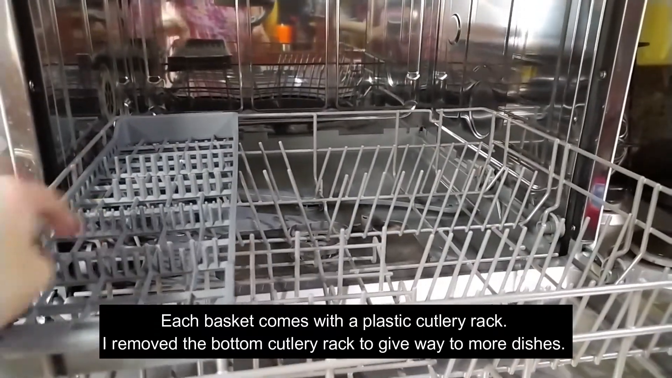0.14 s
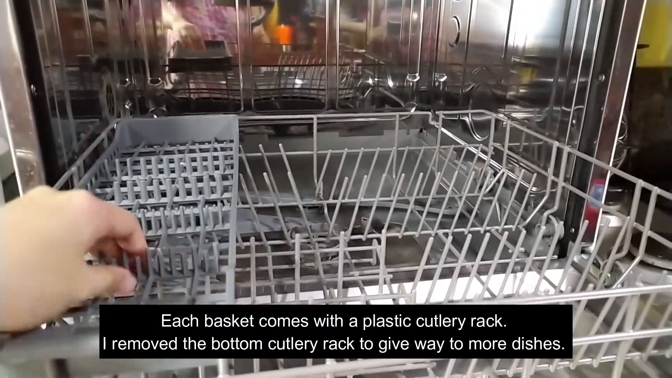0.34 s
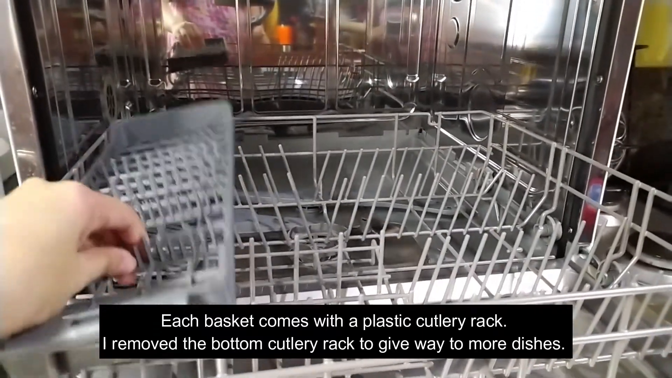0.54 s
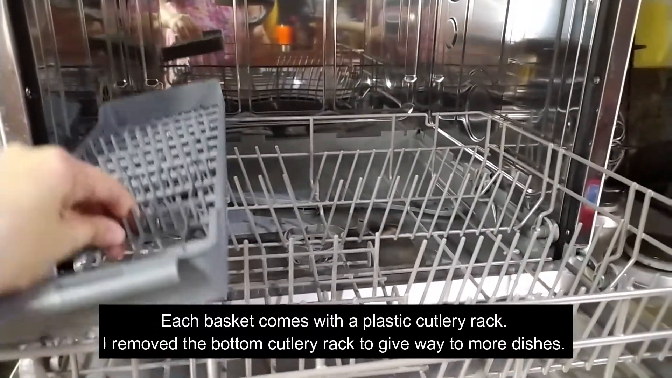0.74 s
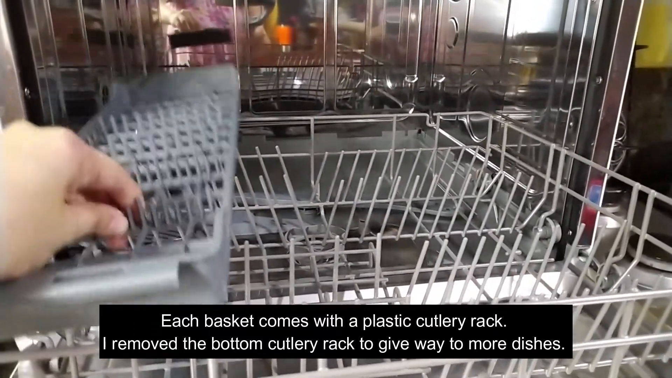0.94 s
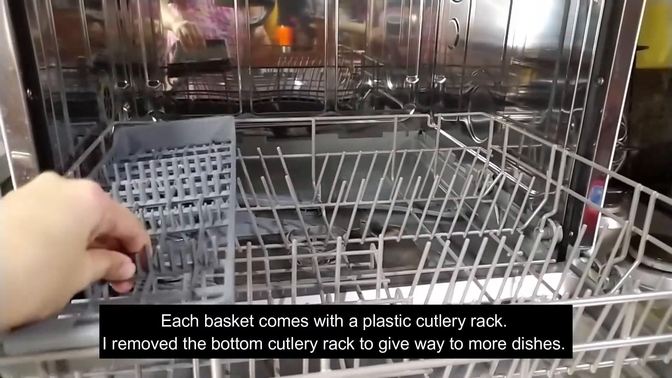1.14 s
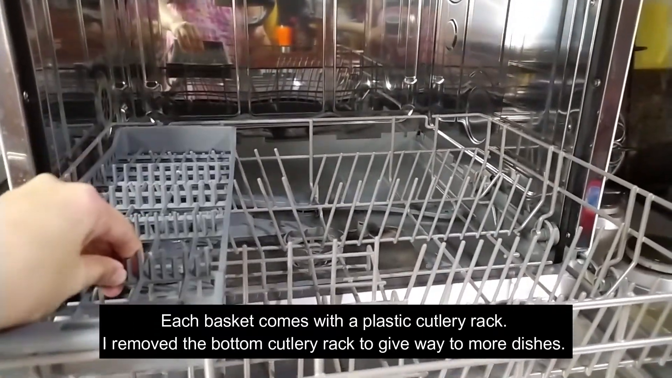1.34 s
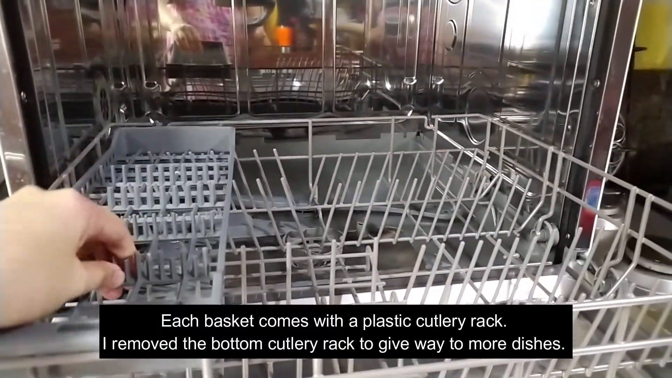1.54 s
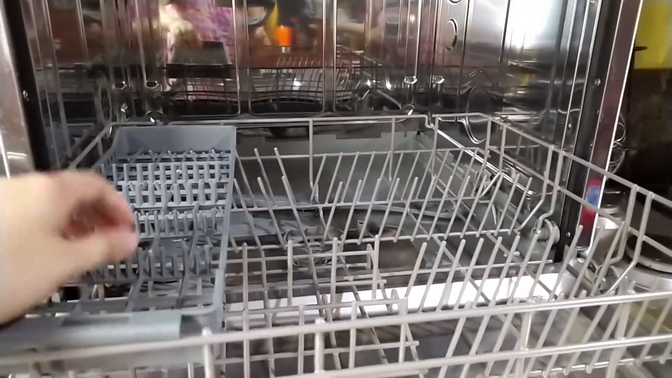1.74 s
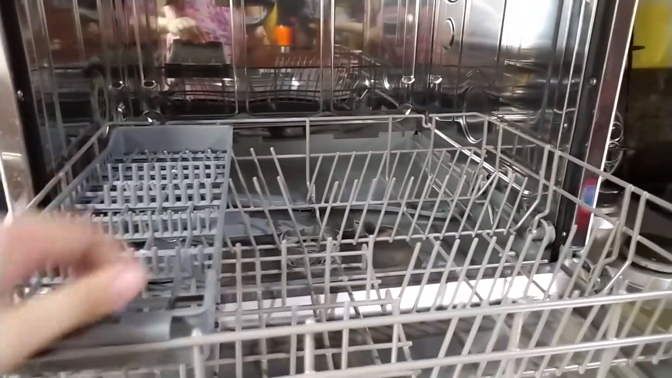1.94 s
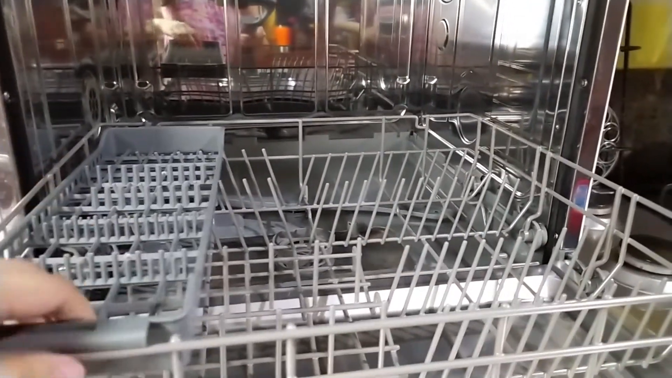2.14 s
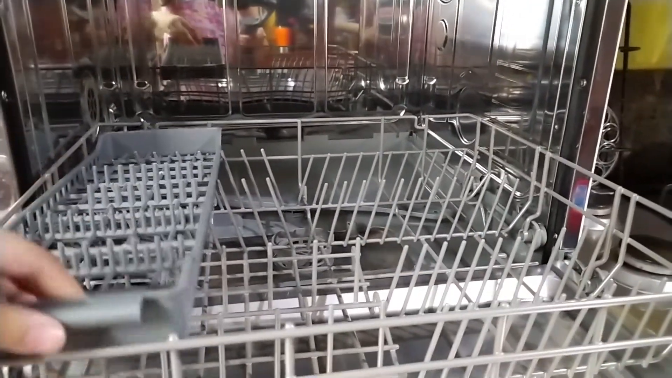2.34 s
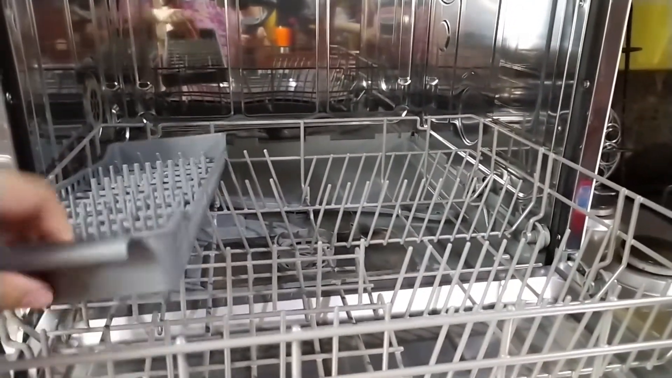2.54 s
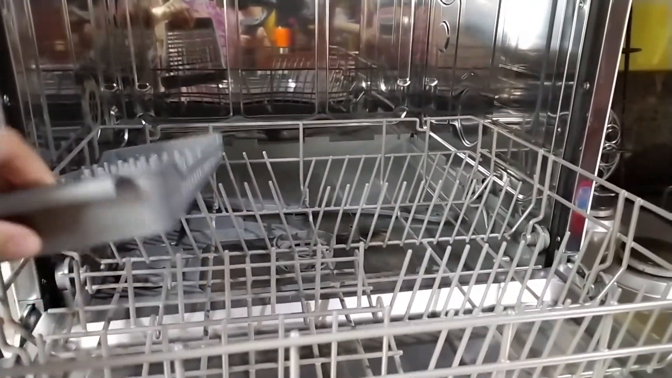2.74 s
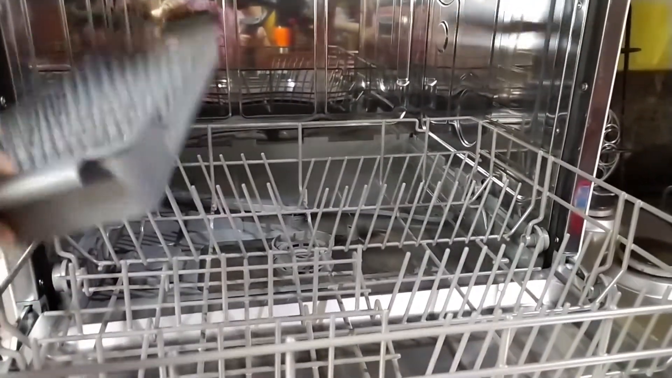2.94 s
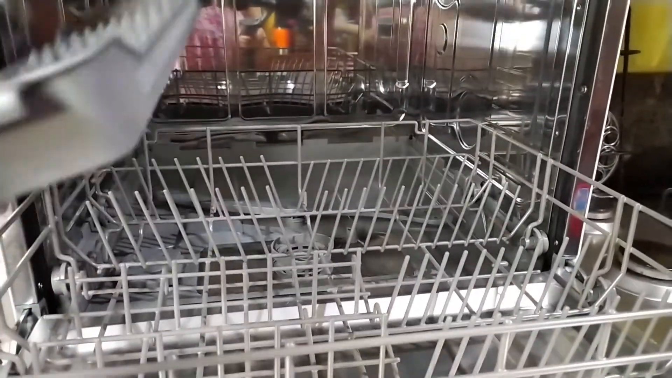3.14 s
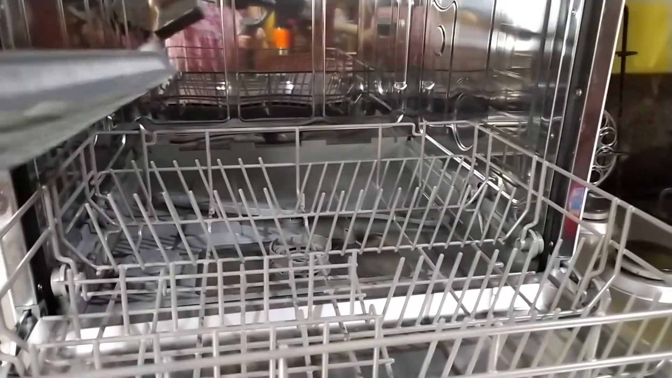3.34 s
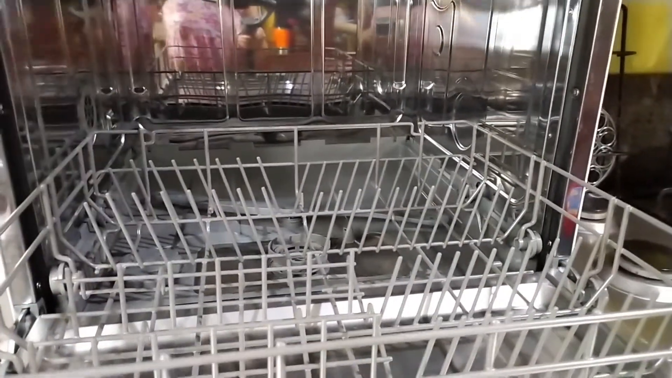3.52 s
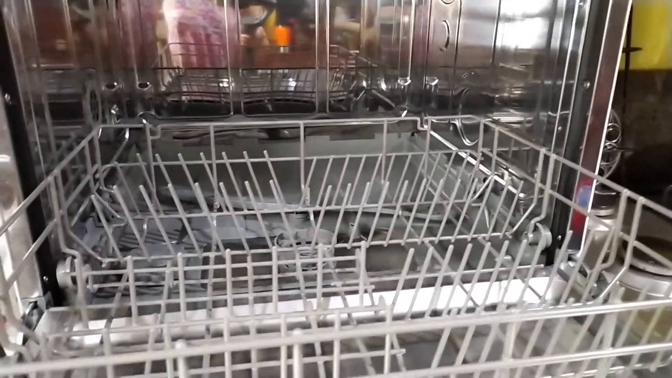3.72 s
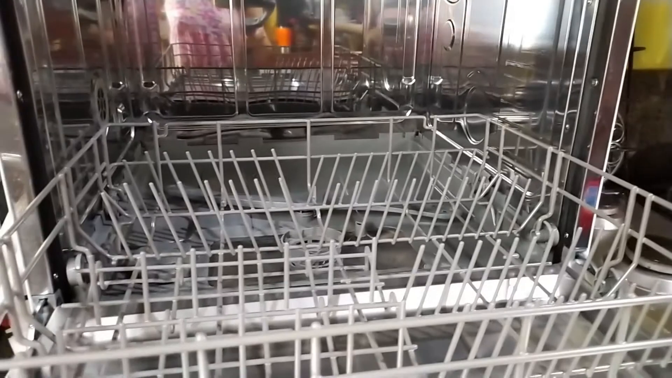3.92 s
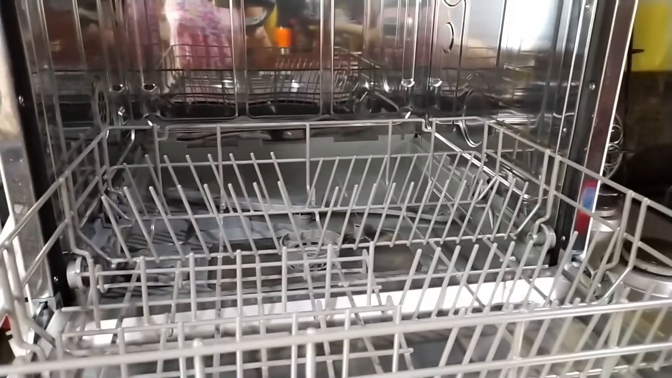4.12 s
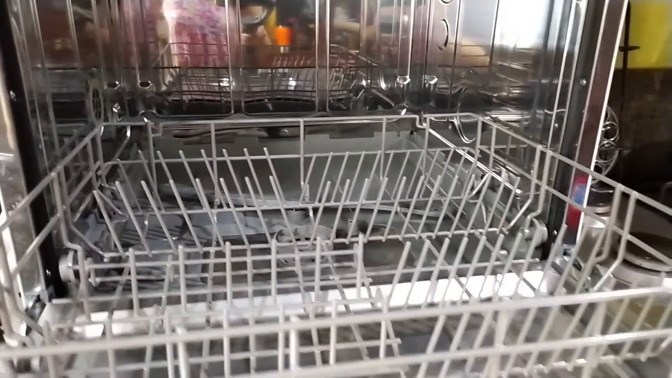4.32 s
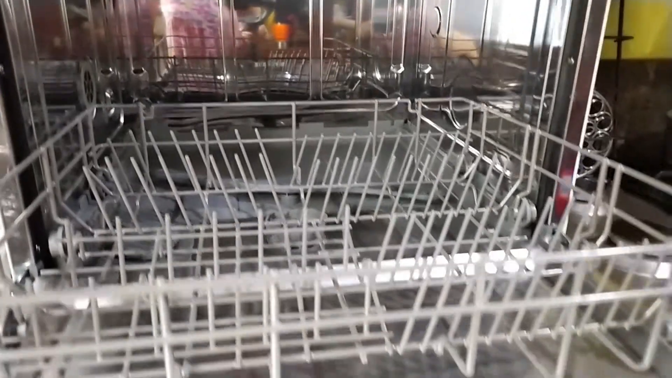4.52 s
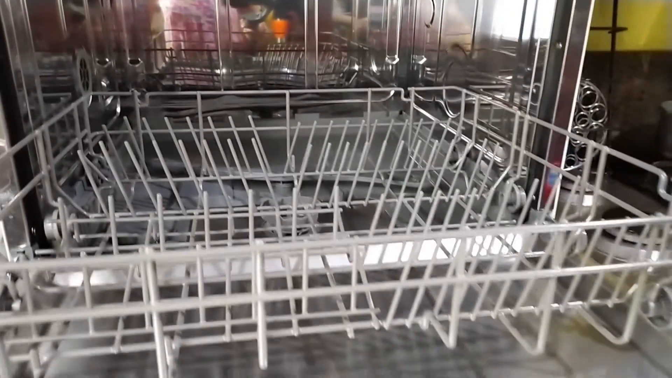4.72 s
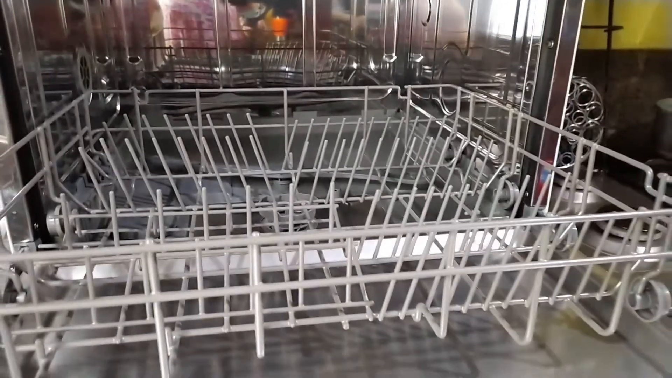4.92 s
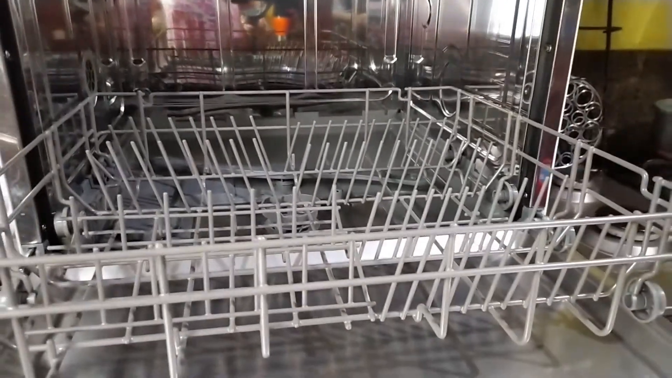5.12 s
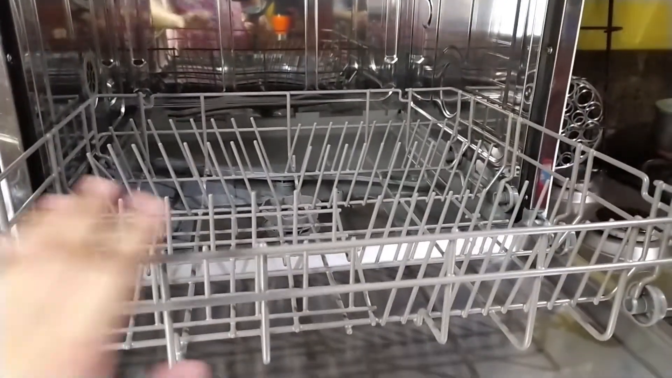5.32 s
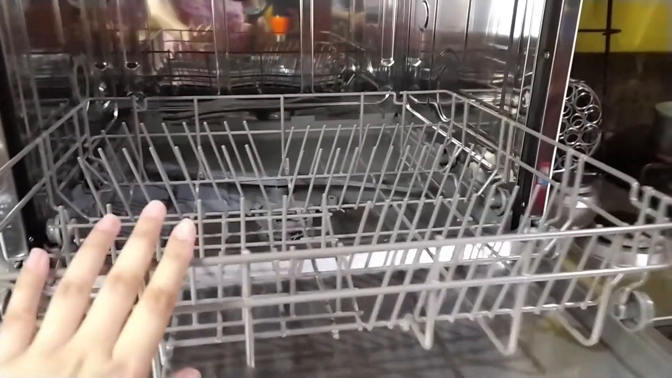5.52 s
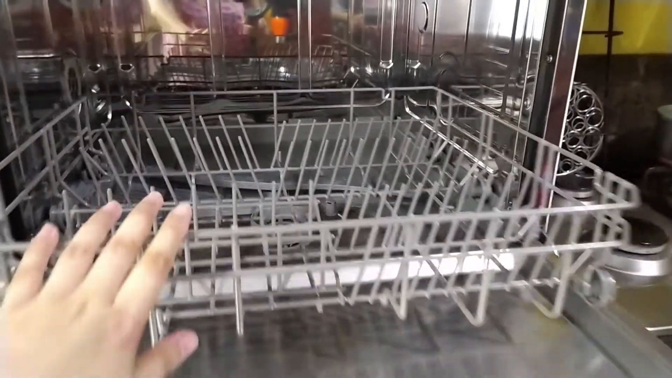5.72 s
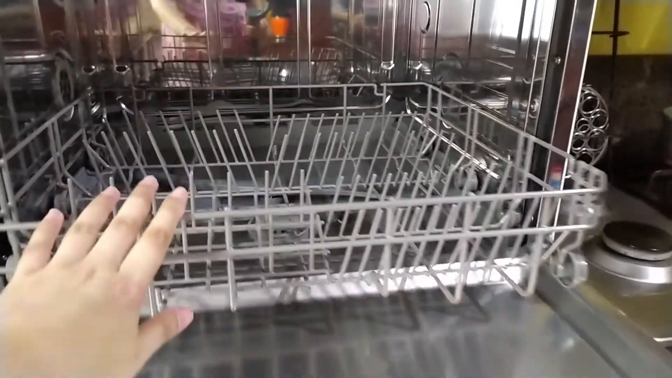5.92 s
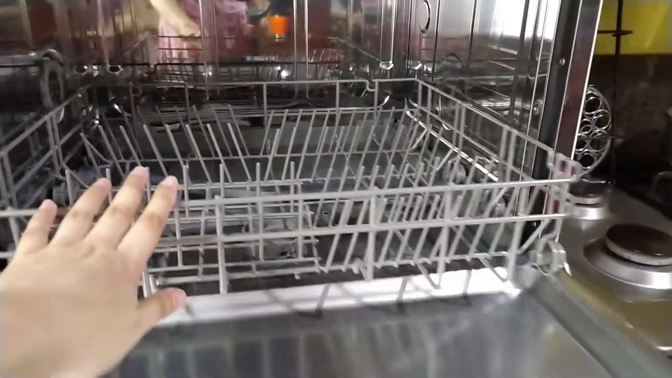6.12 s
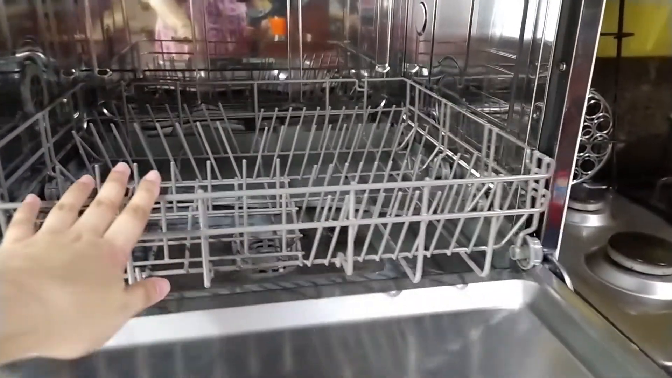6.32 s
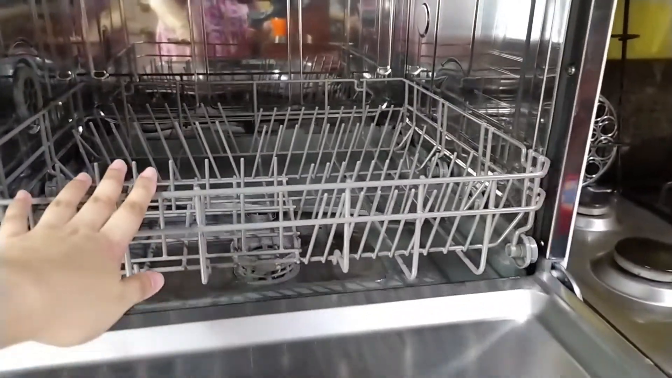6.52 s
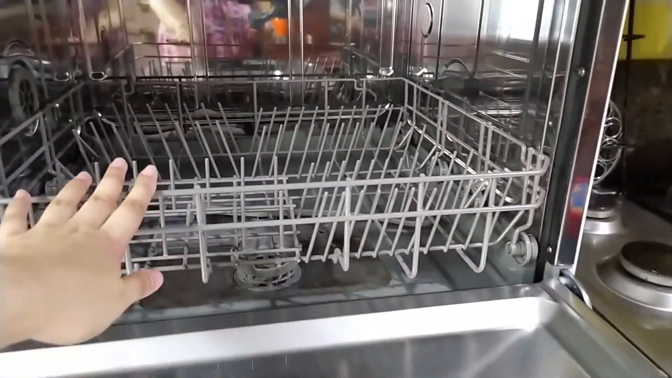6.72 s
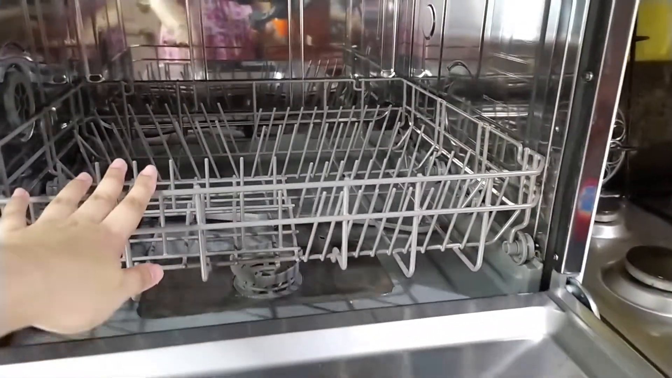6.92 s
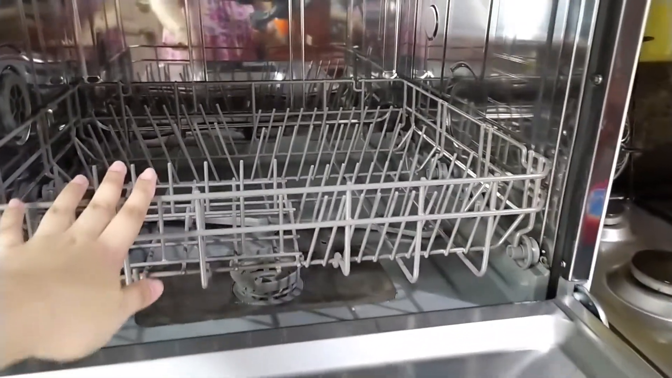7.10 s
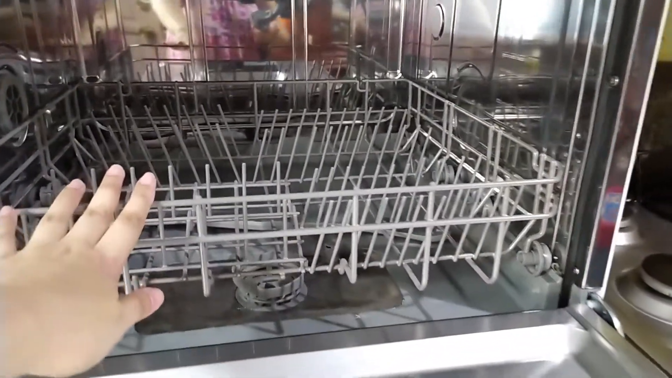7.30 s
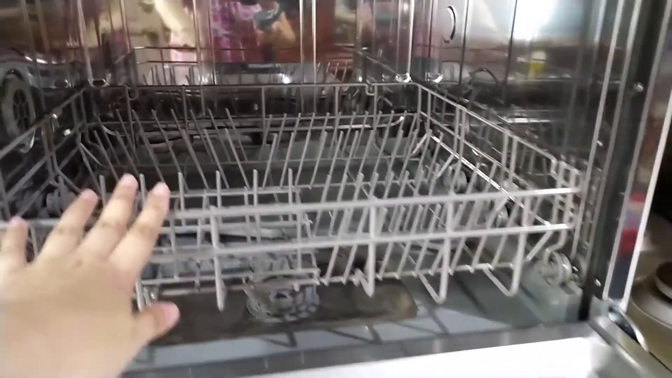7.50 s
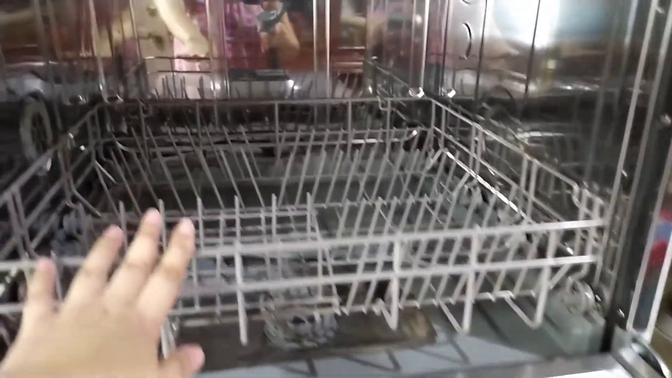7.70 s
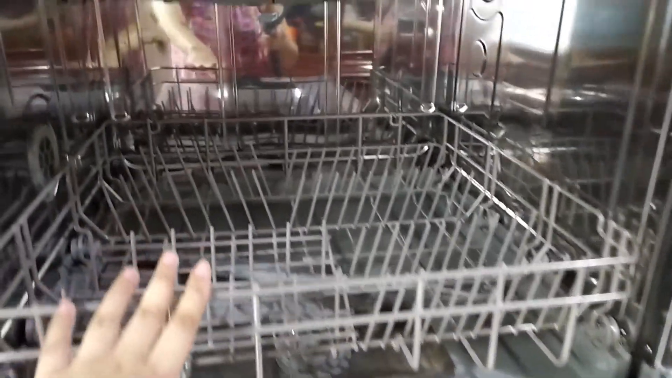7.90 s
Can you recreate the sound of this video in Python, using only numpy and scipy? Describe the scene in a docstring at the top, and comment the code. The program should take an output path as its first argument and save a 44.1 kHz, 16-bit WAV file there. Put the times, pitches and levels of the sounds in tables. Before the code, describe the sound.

Heard from close by the open door of a dishwasher, a light plastic tray clatters and drags against a wire basket in separate bursts, each knock booming a little in the steel tub. Two ringing wire clacks follow. Then small wheels rumble as the basket is pushed in, thudding against its stop, with a few light rubs afterwards. The kitchen around it is quiet.

```python
"""A plastic cutlery tray shudders and knocks about in the wire basket of a tabletop dishwasher,
then scrapes the wires as it is lifted out. Wire clacks on wire; the basket rolls in on small wheels
and bumps the back of the steel tub. Each blow is a crack that sets tray or wires ringing, booms in
the open tub and dies away in a quiet kitchen. Drags, scrapes and rolls are streams of tiny jolts.
Soft room tone and a faint, high ticking lie underneath."""
import sys
import numpy as np
from scipy import signal
from scipy.fft import rfft, irfft
from scipy.io import wavfile

SR = 44100
rng = np.random.default_rng(int(sys.argv[2]) if len(sys.argv) > 2 else 0)


def int16_out(signal):
    """Quantize to a 16-bit WAV file."""
    q = np.round(np.clip(np.atleast_2d(signal).T, -1, 1) * 32767)
    wavfile.write(sys.argv[1], SR, q.astype(np.int16))


N = 355181

# Hits: (time [s], body level [dB], boom [dB], ring [dB], tick [dB], attack [s], contact note [Hz],
# damping [1/s]). Boom, ring and tick are relative to the body; negative damping lengthens the decay.
TRAY_HITS = [ (0.041, -46, -12.5, -14.5, -27.5, .0006, 844, 6.5),
             (0.097, -55, -5, -1.5, -11, 0.00064, 3000, 1.3),
             (0.277, -52.5, -9, -9.5, -23, .0007, 1090, -1), (0.531, -66, -1, -5.5, -18, 0.0023, 1000, -4),
             (0.586, -46, 2.5, -2, -15, .001, 775, 1.5), (1.040, -39, -15.5, -14.5, -33, 0.0014, 1250, -2),
             (1.097, -43.5, -9, 3.5, -9, 0.00051, 3550, -1), (1.122, -34.5, -6, -2, -11, 0.0043, 3660, 9.5),
             (1.171, -36, -9.5, -13.5, -33, .0014, 740, 0.7),
             (1.225, -47.5, -2, -2, -12.5, 0.001, 656, -0.5),
             (1.979, -58, -2.5, -3.5, -13.5, .001, 746, 0.5),
             (2.295, -65.5, 0.5, -3.5, -6.5, .0015, 1190, -0.5),
             (2.447, -47, -12.5, -10.5, -21, 0.0058, 700, -2),
             (2.515, -46, -6, -12.5, -15.5, 0.00092, 777, 4),
             (2.773, -53.5, -5.5, -4.5, -22, 0.0051, 3200, 6),
             (2.810, -49, 5.5, -7.5, -30.5, 0.0063, 302, -1), (2.992, -28, -4.5, -5, -15, 0.0011, 870, 5),
             (3.2725, -28, -3.5, -15, -19, 0.000082, 468, 9)]  # plastic on wire
WIRE_HITS = [ (4.153, -34.5, -12, 8.2, -11.5, 0.00045, 3870, 1.6),
             (4.346, -46.5, -6, 6.1, -9.5, .0008, 4330, 5)]  # wire on wire
BASKET_HITS = [ (4.717, -69, -4, -3.5, -10, .0015, 1050, 5.8),
               (5.613, -61.5, -5, -12, -32, .0008, 1020, 1.1),
               (5.906, -57.5, -5, -11, -17, 0.0058, 1070, 4.5),
               (6.058, -43.5, -5, -5, -20, 0.0036, 590, 3.6),
               (6.383, -53.5, -8.5, -11.5, -24.5, .001, 1030, 14),
               (6.637, -62.5, -.5, -9, -18.5, 0.0071, 920, 2.8),
               (6.983, -32.5, -4.5, -8.5, -25, 0.00013, 900, 7.6),
               (7.595, -65.5, 6.5, 1.5, -6, 0.0023, 1060, 0.96)]  # wheels over the door sill, basket against its stop
# Boom, body, ring and tick bands of a hit: (low edge [Hz], high edge [Hz])
HIT_BANDS = [(80, 350), (350, 1300), (1300, 5000), (5000, 11000)]
# Hand strokes: (start [s], swell [s], length [s], peak [dB])
DRAG_STROKES = [(0, .006, .03, -58), (.72, 0.044, 0.17, -62), (1.14, .015, 0.32, -48),
                (2.50, 0.015, .15, -52.5), (2.79, 0.021, 0.25, -46), (3.36, 0.15, 0.13, -51)]  # drags that make the tray shudder
RUB_STROKES = [(3.40, 0.023, 0.14, -56.5), (7.29, 0.032, 0.061, -62.5), (7.60, 0.047, 0.053, -49),
               (7.98, 0.041, 0.05, -63.5)]  # light rubs along the wires
PUSH_STROKES = [(4.69, 0.053, 0.072, -61), (4.92, .03, 0.04, -68), (5.38, 0.3, 1.55, -53),
                (7.42, .15, 0.76, -63.5)]  # pushes that roll the basket
# Resonances of tub, tray and basket: (frequency [Hz], relative level [dB], t60 [s])
TUB_RING = [(119.2, -2, 0.58), (130.8, -3, 0.17), (136, -6.5, 0.18), (187.5, -1, 0.14), (196, -4, 0.66),
            (296.7, 1, 0.63), (332.7, -6, 0.32), (425, -11.5, 0.49)]
TRAY_RING = [(388.3, 2.5, 0.64), (439, -2.5, 0.54), (562, 4.5, 0.15), (740, 3, 0.49), (810, 0.5, 0.69),
             (994, 4.5, 0.54), (1660, 1, .26), (2660, -25.5, .4), (3200, -6.5, 0.5), (3550, -6.5, .25),
             (3914, -4.5, 1)]
WIRE_RING = [(582, -6.5, 0.49), (810, -4, 0.2), (947, -1, 0.93), (1157, 4, 0.83), (1588, 5.5, 0.31),
             (1995, -11, 0.9), (2200, -4, 0.22), (2755, 2, 0.17), (3000, 3, .3), (3370, 3.5, 0.26),
             (3660, 6.5, 0.41), (3800, 1.5, 0.51), (4400, -10, .28), (4660, -16, .27)]
# Decay of the crowd of weaker modes in tub and basket: (frequency [Hz], t60 [s])
TAIL_DECAY = [(100, 0.48), (250, 0.73), (600, 0.7), (1500, 0.54), (3800, 0.39), (10000, 0.54)]
# Tone colour of each layer: (frequency [Hz], gain [dB])
ROOM_EQ = [(18, -84), (30, -53.5), (111, -5), (157, -16.5), (201, 3.5), (222, -4), (298, -14), (338, -16),
           (373, -16.5), (412, -11.5), (1220, -12.5), (1600, -21), (3120, -20), (5510, -31), (11000, -36),
           (14300, -62.5), (22000, -120)]
JUDDER_EQ = [(50, -31.5), (108, 4), (160, -14), (200, -1), (250, 0.5), (310, -6), (380, -11.5),
             (600, -15.5), (1200, -17.5), (3500, -30.5), (6500, -44.5), (9400, -34.5), (11000, -56)]
TRAY_EQ = [(30, -43), (60, -22), (125, 4.5), (190, 0.5), (255, -1.5), (300, 2), (350, -6), (440, -0.5),
           (520, -4), (800, -5.5), (1900, -16.5), (3600, -14), (6000, -33), (9200, -33), (11000, -48.5)]
TICK_EQ = [(4000, -38.5), (6500, -25.5), (7800, -11), (9400, 7.5), (10200, 3), (11000, -29.5)]
SCRAPE_EQ = [(100, -22), (500, -4.5), (1100, -0.5), (1500, -7), (3600, -6), (6000, -16.5), (9600, -14),
             (11000, -29)]
CLACK_EQ = [(29, -58), (50, -35), (181, -5), (254, -14), (500, -7.5), (559, -2), (640, -8.5), (803, 2.5),
            (1440, -6), (2170, -2.5), (2370, -8.5), (3810, -3), (5980, -22.5), (9610, -23), (11000, -38),
            (14300, -79.5), (22000, -120)]
ROLL_EQ = [(50, -41), (85, -13), (115, 11.5), (155, -8), (195, 1.5), (300, -0.5), (460, -4.5), (700, -5.5),
           (1100, -6), (1500, -15.5), (2800, -19), (4500, -26), (6600, -36), (9600, -25.5), (11000, -47)]
BUMP_EQ = [(30, -41), (55, -34), (90, -9), (115, -5.5), (200, -3), (260, -8), (320, -14.5), (430, -4.5),
           (650, -7.5), (1080, -2.5), (1400, -9.5), (1900, -7.5), (4000, -21), (5200, -29), (6700, -41),
           (9600, -38), (11000, -54)]

RING = 32768  # samples in one ring-out
RING_TIME, RING_HZ = np.arange(RING) / SR, np.fft.rfftfreq(RING, 1 / SR)
TAIL_HZ = np.geomspace(60, 15000, 9)  # centres of crossfaded bands, about an octave apart
TAIL_BANDS = np.sqrt([np.interp(np.log(RING_HZ + 1), np.log(TAIL_HZ), row) for row in np.eye(9)])
PLASTIC_TAIL = dict(early_db=-3, early_t60=0.074, bloom_cycles=1.5)
WIRE_TAIL = dict(early_db=-1.5, early_t60=0.13, bloom_cycles=2)
BASKET_TAIL = dict(early_db=-1.5, early_t60=0.18, bloom_cycles=0.26)


def undb(db):
    """Decibels to gain."""
    return 10 ** (np.asarray(db) / 20)


def unit(x):
    """Scale to rms 1."""
    return x / np.sqrt(np.mean(x ** 2) + 1e-30)


def fade(t60):
    """Exponential decay, 60 dB down after t60 seconds."""
    return np.exp(-np.log(1000) * RING_TIME / t60)


def at_hz(points, hz):
    """Read a curve on a log-frequency axis."""
    freqs, values = np.transpose(points)
    return np.interp(np.log(hz + 1e-9), np.log(freqs), values)


def colour(x, eq, size=4096):
    """Minimum-phase EQ: nothing sounds ahead of an attack."""
    cepstrum = irfft(np.log(undb(at_hz(eq, np.fft.rfftfreq(size, 1 / SR)))))
    cepstrum[1:size // 2] *= 2
    cepstrum[size // 2 + 1:] = 0
    return signal.fftconvolve(x, irfft(np.exp(rfft(cepstrum))))[:len(x)]


def ring(modes, detune=0.0029):
    """Damped modes, with polarity and fine tuning drawn anew for each strike."""
    out = 0
    for hz, db, t60 in modes:
        side, shift = rng.standard_normal(2)
        tone = np.sin(2 * np.pi * hz * (1 + detune * shift) * RING_TIME)
        out += np.sign(side) * undb(db) * fade(t60) * tone
    return unit(out)


def room_tone(air_db=-70):
    """Steady kitchen air; the open tub hums beneath it at its own resonances."""
    air = unit(colour(rng.standard_normal(N), ROOM_EQ))
    hum = unit(signal.fftconvolve(rng.standard_normal(N + SR), ring(TUB_RING), "valid")[:N])
    return undb(air_db) * (air + undb(-7) * hum)


def dense_tail(early_db, early_t60, bloom_cycles):
    """A wash of modes and reflections: a quick early decay, then the tub; the lows bloom late."""
    bands = irfft(TAIL_BANDS * rfft(rng.standard_normal(RING)))
    out = 0
    for hz, band in zip(TAIL_HZ, bands):
        decay = fade(at_hz(TAIL_DECAY, hz)) + undb(early_db) * fade(early_t60)
        bloom = 1 - np.exp(-RING_TIME * hz / bloom_cycles)
        out += band * decay * bloom
    return unit(out)


def hand_effort(strokes, sag_db_per_s, release_s, swell_db=21.5):
    """Each stroke swells as the hand takes hold, sags as it slows and dies away when it stops."""
    gain = np.zeros(N)
    for start, swell_s, length_s, peak_db in strokes:
        age = np.arange(N) / SR - start
        onset_db = swell_db * np.clip(1 - age / swell_s, 0, 1)
        sag_db = sag_db_per_s * np.maximum(age - swell_s, 0)
        release = np.exp(-np.maximum(age - length_s, 0) / release_s)
        gain += (age >= 0) * undb(peak_db - onset_db - sag_db) * release
    return gain


def friction(effort, eq, tail, jolts_per_s, spread_db):
    """Tiny slips and jolts of uneven size shake the basket inside the tub."""
    slips = rng.random(N) < jolts_per_s / SR
    sizes = undb(spread_db * np.clip(rng.standard_normal(N), -2, 2))
    jolts = unit(slips * sizes * rng.choice([-1, 1], N)) * effort
    corner = rng.integers(0, 4, N)
    out = 0
    for k in range(4):  # each corner of the basket rings its own way
        wires = undb(-20) * ring(WIRE_RING)
        response = colour((dense_tail(**tail) + wires) * fade(1.0), eq)
        out += signal.oaconvolve(jolts * (corner == k), unit(response) / np.sqrt(RING))[:N]
    return out


def tray_judder():
    """The dragged tray sticks and slips with a low shudder."""
    drags = hand_effort(DRAG_STROKES, sag_db_per_s=38.5, release_s=0.016)
    return friction(drags, JUDDER_EQ, PLASTIC_TAIL, jolts_per_s=270, spread_db=3.5)


def contact_note(hz, cycles=24, width=0.14):
    """The short clack of the struck spot itself: a cluster of close, heavily damped modes."""
    cluster = np.exp(-(np.log(RING_HZ / hz + 1e-9) / width) ** 2)
    return unit(irfft(cluster * rfft(rng.standard_normal(RING))) * fade(0.015 + cycles / hz))


def chatter(max_gap_s, bounce, count=4):
    """A first touch and a few weaker rebounds at uneven gaps."""
    force = np.zeros(SR // 4)
    force[0] = 1
    times = np.cumsum(max_gap_s * rng.uniform(0.4, 1, count))
    force[(times * SR).astype(int)] += bounce ** np.arange(1, count + 1) * rng.choice([-1, 1], count)
    return force


def voice_hit(hit, target_db, size=2048):
    """EQ the attack's boom, body, ring and tick toward their levels: the hardness of the contact."""
    power = abs(rfft(hit[:size], 2 * size) / size) ** 2
    hz = np.fft.rfftfreq(2 * size, 1 / SR)
    band_db = 10 * np.log10([power[(hz > low) & (hz < high)].sum() for low, high in HIT_BANDS])
    centres = np.sqrt(np.prod(HIT_BANDS, axis=1))
    return colour(hit, np.c_[centres, target_db - band_db])


def blows(hits, eq, modes, tail, modes_db, tub_db, crack_db, note_db, chatter_s, bounce):
    """Each blow layers a chattering crack, the struck part's ring, tub boom and kitchen reverb."""
    out = np.zeros(N + RING)
    for time_s, level_db, boom_db, ring_db, tick_db, attack_s, note_hz, damping_per_s in hits:
        crack = undb(crack_db) * unit(rng.standard_normal(RING) * fade(0.0098))
        stiffness_db = 3.5 * np.log2(note_hz / 1000)  # stiffer, higher spots speak more clearly
        note = undb(note_db + stiffness_db) * contact_note(note_hz)
        transient = signal.fftconvolve(crack + note, chatter(chatter_s, bounce))[:RING]
        grip = np.exp(-RING_TIME * damping_per_s)  # a firm grip or resting contact damps the ring
        resonance = (dense_tail(**tail) + undb(modes_db) * ring(modes)) * grip
        tub = undb(tub_db) * ring(TUB_RING)
        kitchen = undb(-16) * unit(rng.standard_normal(RING) * fade(t60=0.99))
        attack = 1 - np.exp(-RING_TIME / max(attack_s, 1e-4))  # a glancing blow takes hold slowly
        hit = colour((transient + resonance + tub + kitchen) * attack, eq)
        start = int(time_s * SR)
        out[start:start + RING] *= grip  # the new contact also acts on what still rings
        out[start:start + RING] += voice_hit(hit, level_db + np.array([boom_db, 0, ring_db, tick_db]))
    return out[:N]


def tray_knocks():
    """Light plastic bounces on the wires with a hollow clatter."""
    return blows(TRAY_HITS, TRAY_EQ, TRAY_RING, PLASTIC_TAIL, modes_db=-17, tub_db=-25.5,
                 crack_db=-8.5, note_db=-16, chatter_s=0.008, bounce=0.58)


def faint_ticking(first_s=0.182, every_s=0.25, t60=0.11, attack_s=0.004):
    """A very faint, high tick four times a second, slightly uneven in level."""
    beat, age = np.divmod(np.arange(N) / SR - first_s, every_s)
    sizes = undb(3 * np.clip(rng.standard_normal(N), -2, 1))[beat.astype(int)]
    envelope = np.exp(-np.log(1000) * age / t60) * (1 - np.exp(-age / attack_s))
    hiss = unit(colour(rng.standard_normal(N), TICK_EQ))
    return undb(-72) * hiss * sizes * envelope


def wire_scrapes():
    """Light rubs along the wires: fine, fast slips blur into a bright rasp."""
    rubs = hand_effort(RUB_STROKES, sag_db_per_s=41, release_s=0.02)
    return friction(rubs, SCRAPE_EQ, BASKET_TAIL, jolts_per_s=990, spread_db=7)


def wire_clacks():
    """Wire strikes wire with a hard crack and a bright ring."""
    return blows(WIRE_HITS, CLACK_EQ, WIRE_RING, WIRE_TAIL, modes_db=-19.5, tub_db=-20,
                 crack_db=-3.5, note_db=-24.5, chatter_s=0.0072, bounce=0.45)


def basket_roll(rattle_db=-7, fall_db_per_s=84.5, onset_s=0.085):
    """Small wheels rumble with each push; the loose basket rattles on briefly after each bump."""
    shake = hand_effort(PUSH_STROKES, sag_db_per_s=18.5, release_s=0.027)
    for time_s, bump_db, *_ in BASKET_HITS:
        age = np.maximum(np.arange(N) / SR - time_s, 0)
        onset = 1 - np.exp(-(age / onset_s) ** 2)
        shake += undb(bump_db + rattle_db - fall_db_per_s * age) * onset
    return friction(shake, ROLL_EQ, BASKET_TAIL, jolts_per_s=420, spread_db=5.5)


def basket_bumps():
    """The basket thuds over the sill and into its stop, with little rebound."""
    return blows(BASKET_HITS, BUMP_EQ, WIRE_RING, BASKET_TAIL, modes_db=-17.5, tub_db=-18.5,
                 crack_db=-8.5, note_db=-15, chatter_s=0.0066, bounce=0.15)


def scene():
    """Tray, basket and room in mono, heard from just in front of the door."""
    impacts = tray_knocks() + wire_clacks() + basket_bumps()
    movement = basket_roll() + wire_scrapes() + tray_judder()
    return (impacts + movement + faint_ticking() + room_tone())[None]


def record(dry, top_hz=10900):
    """A steep low-pass takes off the top of the treble."""
    return signal.sosfilt(signal.ellip(8, 0.2, 70, top_hz, fs=SR, output="sos"), dry)


dry = scene()
out = record(dry)
int16_out(out)
```